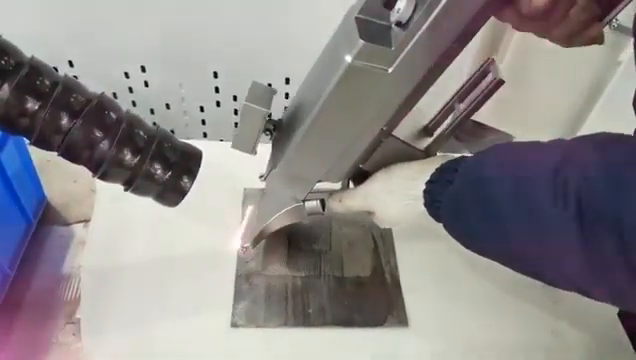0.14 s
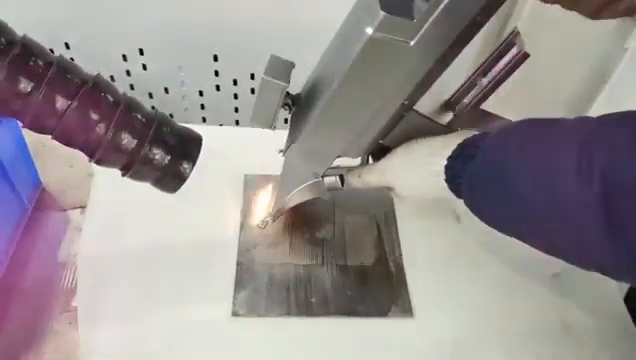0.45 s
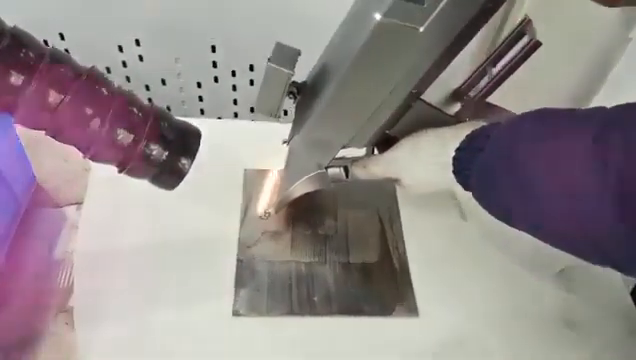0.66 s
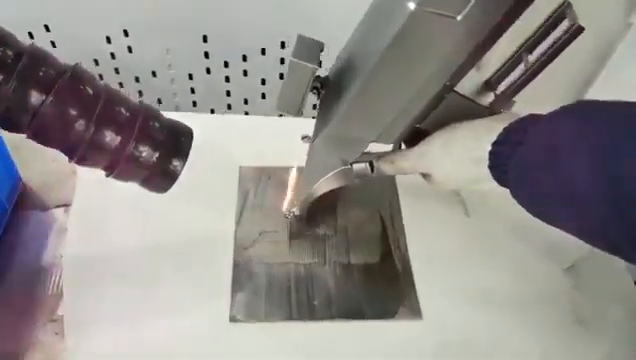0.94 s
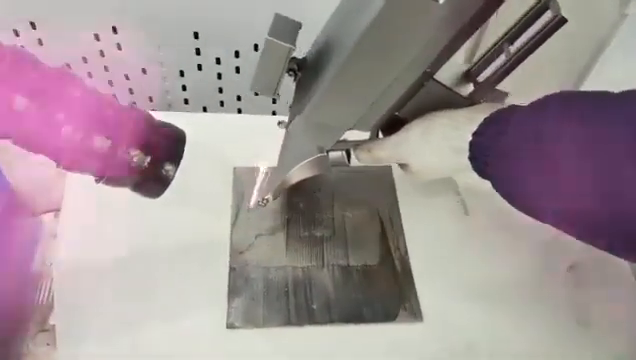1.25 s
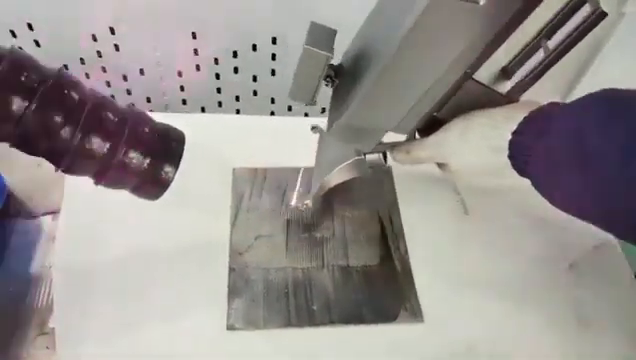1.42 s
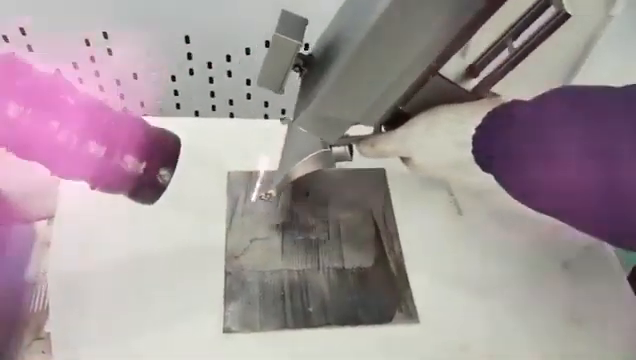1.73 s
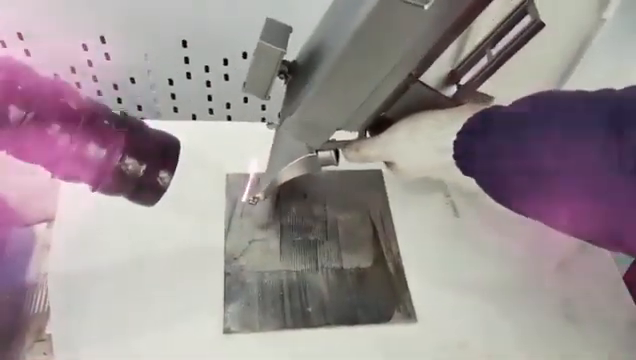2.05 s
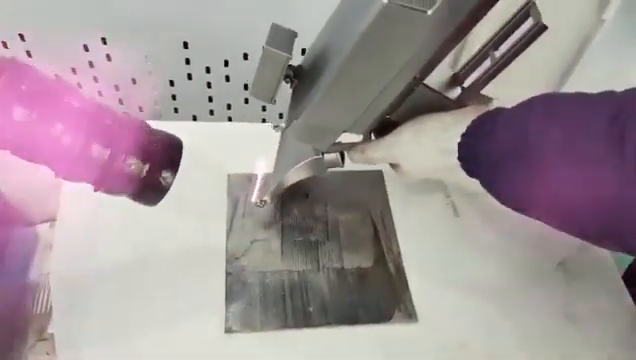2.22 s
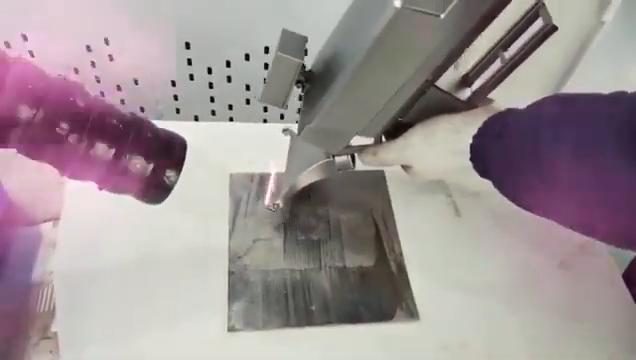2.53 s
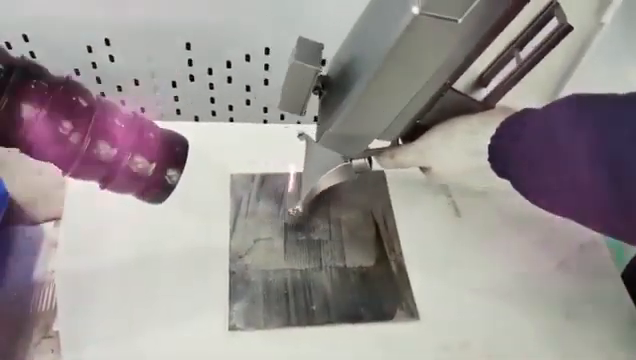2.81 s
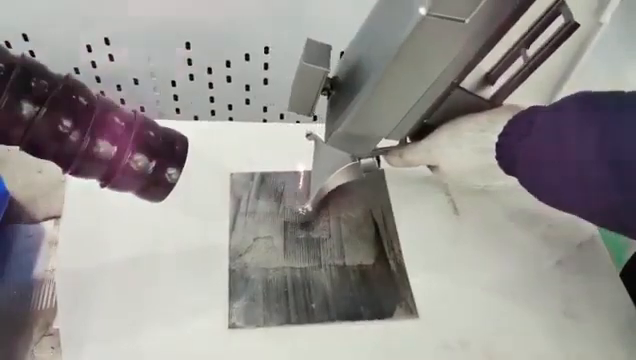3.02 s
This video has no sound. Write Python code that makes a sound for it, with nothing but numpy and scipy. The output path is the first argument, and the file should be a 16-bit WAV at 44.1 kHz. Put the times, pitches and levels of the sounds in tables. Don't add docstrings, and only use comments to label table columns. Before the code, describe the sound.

Laser rust removal sputters with a rapid buzzing hiss and sharp flares while an extractor fan rumbles.

```python
import sys
import numpy as np
from scipy import signal
from scipy.fft import rfft, irfft, next_fast_len
from scipy.io import wavfile
from scipy.ndimage import uniform_filter1d, map_coordinates

SR = 44100
rng = np.random.default_rng(int(sys.argv[2]) if len(sys.argv) > 2 else 0)


def materialize(psi):
    bounded = np.clip(np.atleast_2d(psi).T, -1, 1)
    quanta = np.round(bounded * 32767).astype(np.int16)
    wavfile.write(sys.argv[1], SR, quanta)


def voltage_ratio(level):
    return 10 ** (np.asarray(level, float) / 20)


N = 139797
SWEEP_HZ = 67.19
TOP_HZ = 7580

# (time [s], level [dB])
STROKES = [
    [(0.0, -33.5), (0.144, -39.5), (0.23, -33.5), (0.308, -32), (0.316, -29), (0.44, -26), (0.45, -34.5)],
    [(0.45, -32), (0.548, -29), (0.578, -33.5), (0.644, -32), (0.796, -33), (0.816, -42.5), (0.83, -43)],
    [(0.83, -38.5), (0.96, -28), (0.974, -34), (1.028, -35.5), (1.058, -49), (1.08, -47), (1.11, -60)],
    [(1.11, -59), (1.118, -64), (1.128, -41), (1.175, -38), (1.304, -38.5), (1.324, -46.5), (1.356, -38),
     (1.4, -61)],
    [(1.4, -62), (1.428, -40), (1.488, -39.5), (1.494, -32), (1.506, -45.5), (1.546, -37.5), (1.6, -55.5)],
    [(1.9, -59.5), (1.982, -38.5), (2.17, -41), (2.18, -36.5), (2.218, -40.5), (2.24, -33.5), (2.25, -35.5)],
    [(2.25, -42), (2.328, -32.5), (2.35, -38), (2.362, -39), (2.394, -35), (2.54, -40), (2.58, -54)],
    [(2.58, -57), (2.61, -39.5), (2.636, -34), (2.762, -60), (2.808, -42.5), (2.88, -60.5), (3.17, -43.5)],
]
# (left minus right [dB], boost of the lower half [dB])
STROKE_COLOUR = [(-1.1, 1.1), (-1.1, 1.1), (-.6, .6), (-.4, .3), (.4, .3), (1.1, -.3), (.4, .3), (-1.2, .3)]
# (time [s], place [share of a sweep])
CATCH = [(0, 0), (.25, 0), (.32, .22), (.65, .53), (.85, .84), (1.13, .74), (1.28, .67), (1.49, 1.08),
         (1.97, 1.16), (2.24, 1.3), (3.17, 1.37)]
# (time [s], peak [dB])
FLARES = [(0.2084, -22), (0.2234, -15.5), (.254, -18), (0.3162, -19), (.326, -19), (0.4808, -26.5),
          (0.6479, -13.5), (.846, -25), (1.1273, -13), (1.1438, -14), (1.274, -12), (1.3583, -26),
          (1.4262, -30), (1.4471, -26), (1.4895, -11), (1.9669, -23), (2.0717, -18), (2.2373, -12),
          (2.267, -18), (2.297, -17), (2.362, -18), (2.4159, -17), (2.609, -30), (2.8035, -30)]
# (frequency [Hz], level [dB])
HISS_LEFT = [(500, -24), (1500, -12), (1900, -4.5), (2300, -8.5), (2700, -2), (3450, -3), (4700, 0),
             (7500, -1.5)]
HISS_RIGHT = [(500, -24), (1500, -9.5), (2300, -11), (3000, -3.5), (3500, -4), (4700, 2), (5600, -1.5),
              (7500, -3.5)]
# (frequency [Hz], width [Hz], depth with tool far [ratio], depth with tool near [ratio])
OPPOSED_BANDS = [(750, 200, .3, .2), (1650, 170, .95, .6), (2200, 150, .8, .7), (3320, 250, .9, 1.05),
                 (4500, 350, .3, .7), (5300, 450, 1, .5), (6000, 300, .6, .4), (7000, 500, .4, .3)]
# (time [s], peak [dB], width [ms])
POPS = [(.3927, -15.5, .2), (.4082, -13, .12), (.4089, -11.5, .25), (.8816, -13.5, .2), (.897, -11.5, .2),
        (.9096, -11, .15), (.9253, -13, .25), (.9273, -11.5, .12), (.9419, -12.5, .2), (.9558, -11, .2),
        (.9659, -15, .2), (.9844, -23, .2), (.9966, -16, .2), (1.0097, -19.5, .2), (1.2777, -17, .1),
        (1.2924, -12.5, .15), (1.3014, -16.5, .15), (1.3447, -22, .15), (1.4911, -14.5, .12),
        (1.531, -24, .2), (1.5512, -5, .2), (1.5519, -14, .15), (1.5664, -13, .2), (2.4159, -20.5, .15),
        (2.496, -20, .15), (2.5334, -15.5, .08), (2.6377, -14.5, .12)]
# (multiple of the sweep [count], rms level [dB], left minus right [dB])
MIRROR_TONES = [(16, -60.5, -5.5), (18, -55, 1), (20, -53.5, 1), (22, -63, -3), (24, -56.5, 10.5),
                (26, -61, 3), (33, -64, -1)]
# (frequency [Hz], rms level [dB])
MOTOR_TONES = [(1001.5, -56), (915, -63), (2337, -69), (2675, -60.5)]
# (frequency [Hz], level [dB])
FAN_COLOUR = [(15, -59.5), (25, -21.5), (59, -7.5), (112, -3.5), (204, -6), (330, -8.5), (392, -.5),
              (466, -18), (600, -30.5), (780, -56), (1320, -120)]
# (frequency [Hz], likeness [-1 to 1])
FAN_ALIKE = [(60, .85), (250, .8), (500, .7)]
# (frequency [Hz], width [Hz], level [dB])
DUCT = [(118, 13, 4), (391, 18, 1), (428, 28, -2), (74, 18, -4), (240, 30, -5)]
# (frequency [Hz], level [dB])
AIR_LEFT = [(300, -8.5), (600, -1.5), (900, 1), (1250, -4.5), (1650, -3), (2000, -8.5), (4200, -12),
            (7600, -22)]
AIR_RIGHT = [(300, -13.5), (600, 2.5), (900, 6.5), (1250, -1), (2000, -4), (3500, -4.5), (5800, -12),
             (7600, -11.5)]
# (frequency [Hz], likeness [-1 to 1])
AIR_ALIKE = [(400, .7), (700, .25), (1300, .3), (1950, -.15), (2600, .25), (3300, -.25), (4000, .2),
             (5500, -.1)]
# (time [s], level [dB])
DRAUGHT = [(0, 0), (.21, 2), (.54, -3), (.8, -2), (1.2, -2), (1.4, 2), (1.5, 0), (1.6, -1), (1.85, 3),
           (2.0, 2), (2.2, 1), (2.44, 0), (2.5, -3), (2.8, 1), (3.17, 0)]
# (time [s], gain [dB])
CAMERA_GAIN = [(0, -1), (.25, -1.5), (.42, -5.5), (.7, -5), (.9, 1), (1.07, -2.5), (1.2, 1.5), (1.45, 2),
               (1.58, -1.5), (1.8, 3.5), (1.93, 6), (1.97, 0), (2.3, -1), (2.55, -3), (2.7, -2.5),
               (2.82, 2.5), (3.17, 2)]
# (start [s], end [s], centre [Hz])
SUM_DROPS = [(.03, .08, 3600), (.16, .2, 2200), (.24, .31, 3320), (.49, .58, 5350), (.53, .62, 3320),
             (.58, .66, 1600), (.73, .83, 5400), (.86, .9, 5450), (1.02, 1.08, 1550), (1.65, 1.76, 3900),
             (1.69, 1.79, 5300), (1.84, 1.92, 5750), (1.99, 2.06, 3320), (2.09, 2.17, 3320),
             (2.16, 2.2, 5400), (2.3, 2.4, 3320), (2.48, 2.52, 2250)]
# (start [s], end [s])
TREBLE_GAPS = [
    (1.107, 1.126),
    (1.480, 1.486),
    (1.497, 1.500),
    (1.136, 1.141),
    (2.222, 2.229),
]
SMEARS = [1.13, 1.18, 1.29, 1.35, 1.49, 1.55, 1.93, 1.99, 2.08, 2.24, 2.28, 2.43, 2.61, 3.06]


def unit(x):
    return x / np.sqrt(np.mean(x ** 2, -1, keepdims=True) + 1e-20)


def along(points, hz):
    f, v = np.transpose(points)
    return np.interp(np.log(hz + 1), np.log(f + 1), v)


def curve(rows):
    s, v = np.transpose(rows)
    return np.interp(np.arange(N) / SR, s, v)


def wobble(rate):
    knots = rng.standard_normal(int(N * rate / SR) + 4)
    return map_coordinates(knots, [np.arange(N) * rate / SR])


def filtered(x, response):
    m = next_fast_len(N + SR // 2)
    return irfft(rfft(x, m) * response(np.fft.rfftfreq(m, 1 / SR)), m)[..., :N]


def patchy(patchy_db, count, size):
    z = signal.stft(rng.standard_normal((2, N)), nperseg=256)[2]
    field = uniform_filter1d(rng.standard_normal(z.shape), count, 1)
    field = uniform_filter1d(field, size, 2)
    return signal.istft(z * voltage_ratio(patchy_db * field / field.std()), nperseg=256)[1][:, :N]


def at_ports(pair, left, right, alike):
    def mix(hz):
        share = np.clip(alike(hz), -.95, .95)
        limits = (hz < 8700) * hz ** 2 / (hz ** 2 + 300 ** 2)
        left_gain, right_gain = voltage_ratio([along(left, hz), along(right, hz)]) * limits
        return np.array([left_gain, right_gain * share, right_gain * np.sqrt(1 - share ** 2)])
    first, shared, own = filtered(pair[[0, 0, 1]], mix)
    out = np.array([first, shared + own])
    return out / np.sqrt(np.mean(out ** 2))


def sweep_chop():
    turns = SWEEP_HZ * np.arange(N) / SR + 2 - curve(CATCH) + .05 * wobble(30)
    scatter = rng.standard_normal(int(turns.max()) + 1)[turns.astype(int)]
    chop_db = (4.5 + 1.5 * scatter) * np.exp(-3.5 * (turns % 1))
    chop_db = uniform_filter1d(chop_db, size=40)
    return unit(voltage_ratio(chop_db + 1.5 * wobble(25) + 1.5 * wobble(300)))


def burn_level():
    chop = sweep_chop()
    rows = []
    for stroke in STROKES:
        start = stroke[0][0]
        if rows and start - rows[-1][0] > .1:
            rows.append((start - .02, -60))
        rows += list(stroke)
    rows.sort()
    level = voltage_ratio(curve(rows) + 3) * chop
    rise_s, fall_s, flare_db = .0008, .005, -16.5
    u = np.arange(SR // 10) / SR
    flare = (1 - np.exp(-u / rise_s)) * np.exp(-u / fall_s)
    for s, db in FLARES:
        level[round(s * SR):][:len(u)] += voltage_ratio(db + flare_db) * flare
    return level


def burn():
    t = np.arange(N) / SR
    level = burn_level()
    which = np.searchsorted([stroke[0][0] for stroke in STROKES[1:]], t)
    pan_db, low_db = uniform_filter1d(np.transpose(STROKE_COLOUR)[:, which], size=900, axis=1)
    pair = patchy(3, count=6, size=6)
    centre, width, far_depth, near_depth = np.transpose(OPPOSED_BANDS)[..., None]

    def hiss_with(depth):
        def alike(hz):
            return .42 - np.sum(depth * np.exp(-((hz - centre) / width) ** 2), axis=0)
        return at_ports(pair, HISS_LEFT, HISS_RIGHT, alike)

    hiss = np.where(t < 1.08, hiss_with(far_depth), hiss_with(near_depth))
    low = filtered(hiss, lambda hz: 1 / (1 + (hz / 3600) ** 6))
    pan = voltage_ratio(pan_db * np.array([[.5], [-.5]]))
    return level * pan * (hiss + (voltage_ratio(low_db) - 1) * low)


def pops():
    bumps, reach = np.zeros(N), np.arange(-100, 600)
    for s, db, ms in POPS:
        at = round(s * SR) + reach
        u = (at / SR - s) * 1000 / ms
        back = np.clip(u - 2.5, 0, None) / 2.6
        rebound = .3 * np.e * back * np.exp(-back)
        bumps[at] += voltage_ratio(db) * (np.exp(-u ** 2) - rebound)
    port_hz, damping = 70, 1.4

    def port(f):
        return -f * f / (port_hz ** 2 - f * f + 2j * damping * f * port_hz)
    return filtered(bumps, port) * voltage_ratio([[1.5], [-25]])


def whine():
    t = np.arange(N) / SR
    tones = [(k * SWEEP_HZ, db, pan_db) for k, db, pan_db in MIRROR_TONES]
    tones += [(hz, db, 0) for hz, db in MOTOR_TONES]
    out = 0
    for hz, db, pan_db in tones:
        level = voltage_ratio(db + 1.5 * wobble(5) + pan_db * np.array([[.5], [-.5]]))
        phase = .45 * wobble(10) + rng.uniform(0, 6) + rng.uniform(-.8, .8, (2, 1))
        out = out + np.sqrt(2) * level * np.sin(2 * np.pi * hz * t + phase)
    return out


def fan():
    def rumble(hz):
        return voltage_ratio(along(FAN_COLOUR, hz)) * (hz < 900)

    def duct(f):
        return sum(voltage_ratio(db) * 1j * f * w / (c * c - f * f + 1j * f * w) for c, w, db in DUCT)

    out = 0
    for db, colour in ((-38.5, rumble), (-41.5, duct)):
        def spread(hz):
            turn = np.arccos(np.clip(along(FAN_ALIKE, hz), -1, 1)) / 2
            return colour(hz) * [np.cos(turn), np.sin(turn)]
        mid, side = filtered(rng.standard_normal((2, N)), spread)
        level = voltage_ratio(db + curve(DRAUGHT) + 1.5 * wobble(9))
        out = out + level * unit(np.array([mid + side, mid - side])) * voltage_ratio([[.3], [-.3]])
    air = at_ports(patchy(1.5, count=3, size=12), AIR_LEFT, AIR_RIGHT, lambda hz: along(AIR_ALIKE, hz))
    return out + voltage_ratio(-41.7 + .8 * wobble(7)) * air


def scene():
    gain_db = curve(CAMERA_GAIN)
    room = voltage_ratio(gain_db) * fan() + voltage_ratio(1.3 * gain_db) * whine()
    return room + burn() + pops()


def emptied(z, hz):
    bins = 5
    power = np.add.reduceat(abs(z) ** 2, np.arange(0, len(hz), bins), axis=1) + 1e-14
    power = uniform_filter1d(power, size=2, axis=2)
    under_db = 10 * np.log10(abs(uniform_filter1d(power, size=9, axis=1) / power) + 1e-9)
    under_db = under_db - .7 * under_db.mean(axis=2, keepdims=True)
    shut = 1 / (1 + np.exp(-np.clip(3 * (under_db - 3.9), -30, 30)))
    in_range = (hz > 1200) & (hz < TOP_HZ - 300)
    shut = shut[:, np.arange(len(hz)) // bins] * in_range[:, None]
    return z * voltage_ratio(-24 * shut)


def holes(x):
    frame = 1536
    hz, s, z = signal.stft(x, SR, nperseg=frame)
    left, right = emptied(z, hz)
    mid, side = emptied(np.array([left + right, left - right]) / 2, hz)
    for a, b, centre_hz in SUM_DROPS:
        mid = mid * voltage_ratio(-30 * np.outer(abs(hz - centre_hz) < 130, (s > a) & (s < b)))
    return signal.istft(np.array([mid + side, mid - side]), SR, nperseg=frame)[1][:, :N]


def top_cut(x):
    return signal.sosfilt(signal.butter(12, 8720, fs=SR, output="sos"), x)


def record(dry):
    x, t = holes(dry), np.arange(N) / SR
    gap = uniform_filter1d(sum((t > a) & (t < b) for a, b in TREBLE_GAPS) * 1., size=60)
    treble = filtered(x, lambda hz: 1 / (1 + (4000 / (hz + 1)) ** 4))
    x = x - .9 * gap * treble

    def over(hz):
        return np.clip(hz - TOP_HZ, 0, None)
    leak = filtered(x, lambda hz: (hz > TOP_HZ) * voltage_ratio(-16 - .03 * over(hz)))
    leak = leak * sum(np.exp(-((t - s) / .012) ** 2) for s in SMEARS) * voltage_ratio(-3)
    limited = filtered(x, lambda hz: voltage_ratio(-.22 * over(hz)))
    return top_cut(limited + leak)


dry = scene()
out = record(dry)
materialize(out)
```